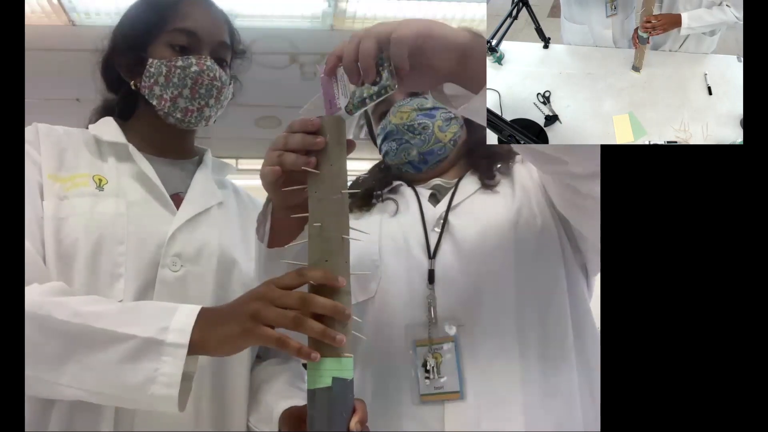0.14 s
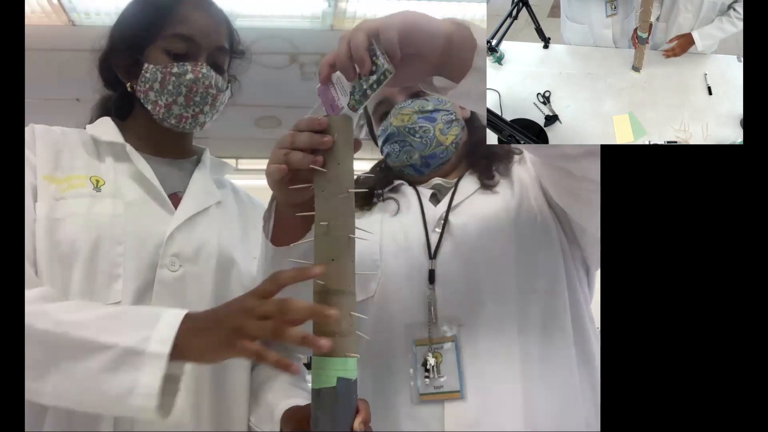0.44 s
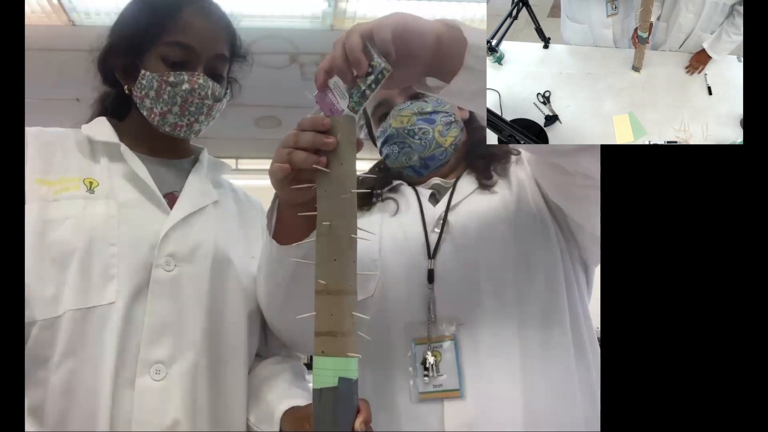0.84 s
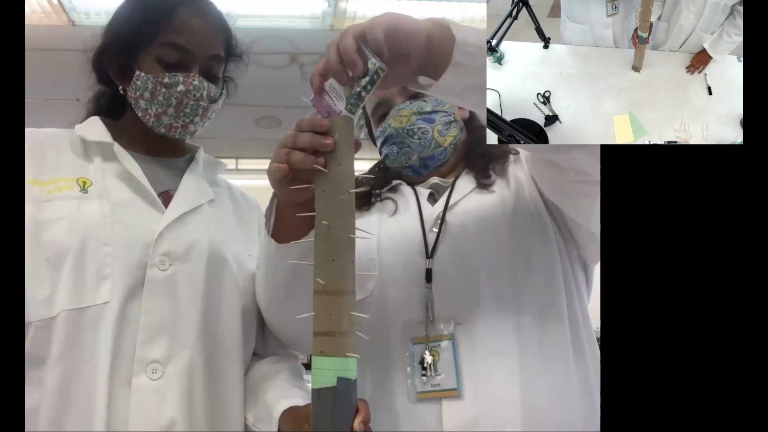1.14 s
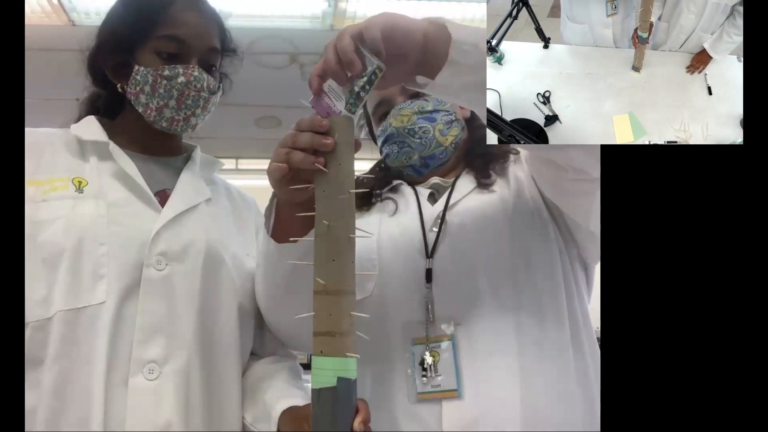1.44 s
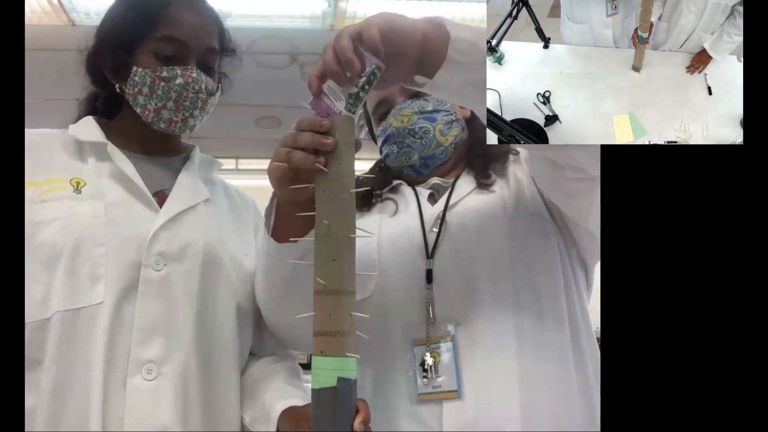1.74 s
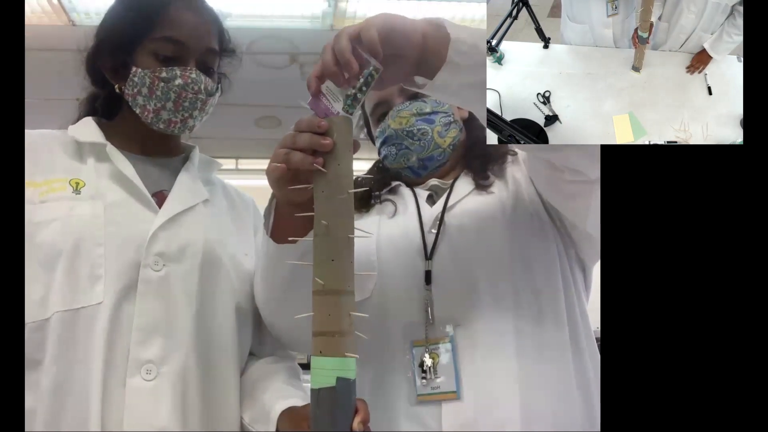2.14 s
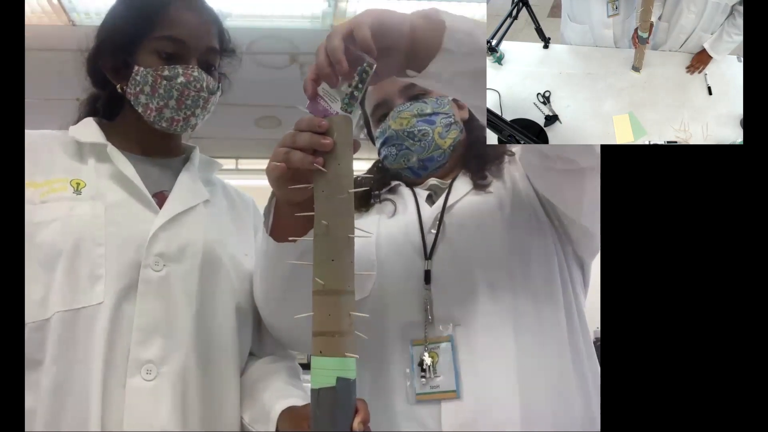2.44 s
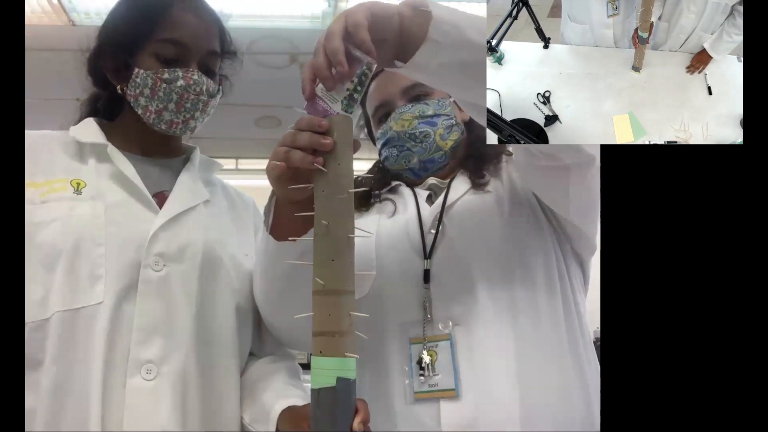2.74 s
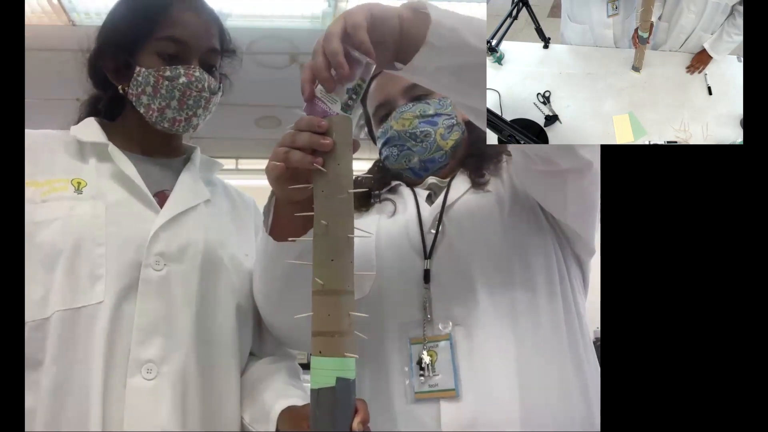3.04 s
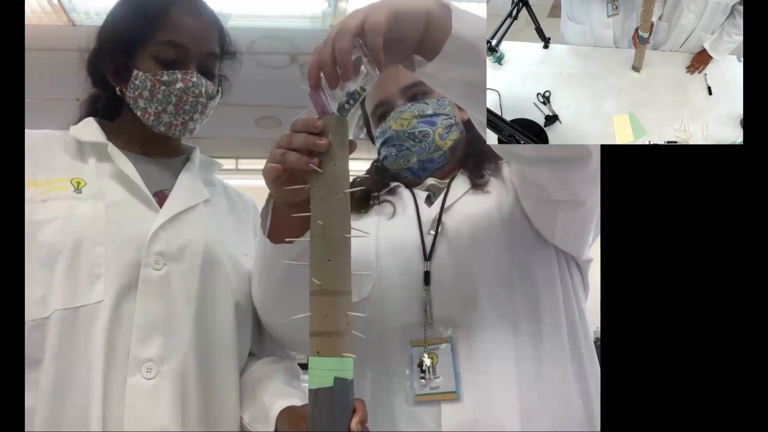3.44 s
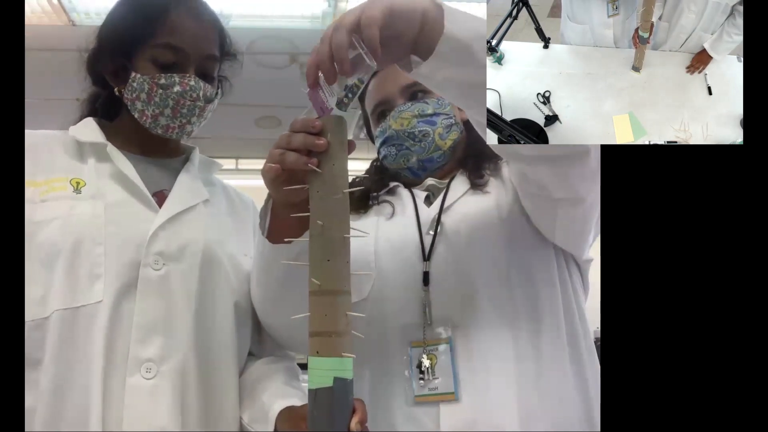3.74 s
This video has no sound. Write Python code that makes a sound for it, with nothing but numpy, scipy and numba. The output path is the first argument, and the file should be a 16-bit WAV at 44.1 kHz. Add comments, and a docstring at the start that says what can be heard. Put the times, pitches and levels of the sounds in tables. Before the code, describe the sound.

Small beads pour down a cardboard tube crossed with toothpicks, heard close in a quiet room. Faint scattered ticks until 0.5 s, then the patter builds quickly to a dense, bright, rain-like hiss from 0.85 to 1.8 s. It thins and stutters around 2.2-2.4 s with ringing clusters, swells again to about 3.4 s, breaks into clicks and fades by 3.75 s, leaving faint room air, low rumble and hum.

```python
"""Small beads patter, swell and thin out as they pour into an upright cardboard tube spiked with toothpicks.
The dense stream is thousands of tiny dying sines, dry clicks and noise, in four bands that flicker.
Clusters of ringing knocks and short hard ticks stand out of it.
Behind them a quiet indoor room has noise for air, a low rumble and a sine hum that wavers."""
import sys
import numpy as np
from scipy import signal
from scipy.fft import rfft, irfft
from scipy.io import wavfile
from scipy.ndimage import uniform_filter1d
from numba import njit

SR = 44100
rng = np.random.default_rng(int(sys.argv[2]) if len(sys.argv) > 2 else 0)


def natural_amplitude(level_db):
    """Convert a level in decibels to a linear amplitude factor, elementwise."""
    exponent = np.asarray(level_db, float) / 20
    return 10 ** exponent


def inscribe(sig):
    """Save sig as 16-bit PCM at rate SR to the path in sys.argv[1].

    A 1-D sig is mono; a 2-D sig holds one channel per row.
    Samples are clipped to [-1, 1] before scaling.
    """
    pcm = np.round(np.clip(np.atleast_2d(sig).T, -1, 1) * 32767)
    wavfile.write(sys.argv[1], SR, pcm.astype(np.int16))


N = 171990  # length in samples

# how strongly the beads pour, before surges and a small trim: t/s, level/dB
FLOW = [(0, -57), (.06, -56.5), (.085, -68), (.15, -62), (.19, -67), (.2, -68), (.215, -57.5), (.3, -54.5),
        (.355, -59.5), (.39, -53.5), (.475, -50.5), (.495, -44.5), (.65, -41.5), (.86, -34), (.97, -35),
        (1.29, -33), (1.49, -34), (1.72, -35), (1.94, -39), (2.15, -39), (2.245, -50), (2.27, -36.5),
        (2.315, -48), (2.351, -41), (2.378, -55), (2.39, -44.5), (2.41, -43.5), (2.45, -41), (2.5, -44.5),
        (2.57, -41.5), (2.61, -43), (2.63, -40.5), (2.75, -38.5), (3.04, -35), (3.19, -36), (3.358, -36),
        (3.374, -44), (3.45, -37.5), (3.49, -38.5), (3.505, -42.5), (3.55, -40), (3.62, -45.5),
        (3.645, -49), (3.73, -50), (3.75, -68.5), (3.9, -79)]
# the band in which clusters and hard ticks are heard: low edge f/Hz, high edge f/Hz
KNOCK_EDGES = (1300, 12000)


def unit(x):
    """Scale to rms 1."""
    return x / np.sqrt(np.mean(x ** 2))


def shape(x, points, edges=None):
    """Colour a sound by (f/Hz, gain/dB) points, optionally only between two edges in Hz."""
    f = np.arange(N // 2 + 1) * SR / N + 1  # the 1 avoids log(0)
    points = np.array(points)
    gain = natural_amplitude(np.interp(np.log(f), np.log(points[:, 0]), points[:, 1]))
    if edges:
        low, high = edges
        gain = gain / np.sqrt((1 + (low / f) ** 16) * (1 + (f / high) ** 16))
    return irfft(rfft(x) * gain, N)


def walk(rate):
    """Random levels, a new one every 1 / rate s, joined by slopes; spread near 1."""
    hold = int(SR / rate)
    steps = np.repeat(rng.standard_normal(N // hold + 1), hold)
    return unit(uniform_filter1d(steps, hold)[:N])


@njit
def rings(n, start, hz, cycles, size):
    """Each knock is a sine that dies by 60 dB in the given cycles."""
    y = np.zeros(n)
    for k in range(len(start)):
        turn = np.exp((2j * np.pi - np.log(1000.) / cycles[k]) * hz[k] / 44100.)
        z = size[k] + 0j
        first = int(start[k])
        last = first + int(cycles[k] * 44100. / hz[k])
        for j in range(max(first, 0), min(n, last)):
            y[j] += z.imag
            z *= turn
    return y


def knocks(start, hz, cycles, size):
    """Sum the rings of many knocks; a value shared by several knocks may be given once."""
    each = np.broadcast_arrays(start, hz, cycles, size)
    return rings(N, *[np.array(a).ravel() for a in each])


def clumps(count=6, handfuls=450):
    """Handfuls of beads at random moments; each chatters briefly near one pitch of picks, wall or air column."""
    # what the handfuls ring with: f/Hz, spread between handfuls (share of f), ring/cycles, level/dB
    clump_rings = [(5800, 0.064, 50, -4.5), (2285, 0.17, 34, -12.5), (484, 0.023, 16.5, -14),
                   (246, 0.024, 12, -18)]
    out = 0
    for hz, spread, cycles, db in clump_rings:
        u = rng.random((handfuls, count + 2))
        g = rng.standard_normal((handfuls, count + 1))
        start = u[:, :1] * N - .004 * SR * np.log(u[:, 2:])  # knocks trail by 4 ms on average
        pitch = hz * np.exp(spread * g[:, :1] + 0.029 * g[:, 1:])
        strength = natural_amplitude(-2.2 * np.log(u[:, 1:2] + 0.071))  # a few handfuls are much stronger
        out = out + natural_amplitude(db) * unit(knocks(start, pitch, cycles, strength))
    return out


def bead_knocks():
    """Single beads ring at scattered moments, pitches and sizes; higher pitches ring for more cycles."""
    knocks_per_s, ring_cycles, scatter_db = 5000, 26.6, 1.5
    u = rng.random((int(knocks_per_s * N / SR), 4)).T
    hz = 200 + 13000 * u[1]
    cycles = ring_cycles * (.5 + u[2]) * np.sqrt(hz / 3000)
    size = natural_amplitude(-scatter_db * np.log(u[3] + .002)) * np.sqrt(hz / cycles)  # even out ring energy
    return unit(knocks(u[0] * N, hz, cycles, size))


def dry_clicks():
    """Beads that do not ring: single samples of random size at random moments."""
    clicks_per_s = 700
    return unit((rng.random(N) < clicks_per_s / SR) * rng.standard_normal(N))


def stream():
    """Knocks, dry clicks, clumps and a noise wash of far knocks; the flow surges and each band flickers."""
    # edges of the four bands (tube boom, wall ticks, toothpick rings, bead sizzle): f/Hz
    band_edges = (250, 1200, 4200, 7000, 12500)
    # colour within the bands: f/Hz, relative level/dB
    stream_colour = [(150, -13), (250, -19.5), (370, -22), (473, -9.5), (773, -12), (1590, -7), (2030, -6),
                     (2430, -3), (3490, -7), (5510, -3), (7650, -7.5), (9310, -1.5), (11000, -4.5),
                     (11700, -9), (12500, -29), (16200, -60), (22000, -120)]
    # balance against the wall ticks: t/s, tube boom/dB, toothpick rings/dB, bead sizzle/dB
    band_balance = [(0, -28, -2, -15.5), (.35, -18.5, -4, 2.5), (.6, -19.5, -5.5, -5), (.8, -15.5, 0, -7),
                    (1.3, -11, -3.5, -6.5), (1.8, -10, -2, -7), (2.0, -18.5, -5.5, -6.5),
                    (2.3, -8.5, -6.5, -10.5), (2.45, -13.5, -5.5, -7), (2.85, -16.5, -2, -6.5),
                    (3.1, -13.5, -5, -6), (3.45, -21, -7, -7), (3.6, -18.5, -13.5, -10.5),
                    (3.75, -28, -7, -17), (3.9, -1, 7, -3)]
    click_db, wash_db, trim_db = -9, -0.5, 0.5
    surge_db, jostle_db, flicker_db = 1.2, 1.67, 1.5
    full_flow_db, evening_per_db = -36, 0.1  # a full stream is even, a thin one surges more

    wash = natural_amplitude(wash_db) * rng.standard_normal(N)
    mix = bead_knocks() + natural_amplitude(click_db) * dry_clicks() + clumps() + wash
    t = np.arange(N) / SR
    level_db = np.interp(t, *np.array(FLOW).T)
    uneven = np.clip(.5 + evening_per_db * (full_flow_db - level_db), .3, 1.05)
    surge = uneven * (surge_db * walk(40) + jostle_db * walk(200))
    times, boom, pick_rings, sizzle = np.array(band_balance).T
    out = 0
    for k, balance in enumerate((boom, 0 * boom, pick_rings, sizzle)):
        band = shape(mix, stream_colour, band_edges[k:k + 2])
        band = unit(band * natural_amplitude(surge + flicker_db * walk(60)))
        out = out + band * natural_amplitude(np.interp(t, times, balance))
    return out * natural_amplitude(trim_db + level_db)


def hum():
    """A mains hum: one sine whose phase drifts and whose level wavers."""
    # slow rise and fall of the hum, before its random waver: t/s, rms level/dB
    hum_level = [(0.0, -82), (0.27, -64.5), (0.49, -81), (0.61, -54), (0.66, -95), (0.75, -65), (0.89, -93),
                 (1.04, -64), (1.07, -84), (1.42, -64), (1.44, -88), (1.75, -69.5), (2.07, -82),
                 (2.15, -64), (2.44, -90), (2.51, -60.5), (2.82, -79.5), (3.16, -67), (3.2, -80),
                 (3.49, -73), (3.53, -64.5), (3.71, -66), (3.82, -102), (3.9, -81)]
    hum_hz = 117.8
    t = np.arange(N) / SR
    phase = 2 * np.pi * hum_hz * t + 0.42 * walk(6.8)
    level_db = np.interp(t, *np.array(hum_level).T) + 2.2 * walk(25.7)
    return np.sqrt(2) * np.sin(phase) * natural_amplitude(level_db)


def rumble():
    """Low noise, unsteady, that grows with the flow of beads."""
    # colour of the rumble: f/Hz, relative level/dB
    rumble_colour = [(20, -11), (50, -10), (90, -3.5), (170, 0), (230, -5.5), (330, -10.5), (500, -29.5)]
    rumble_db = -68
    flow_db = np.interp(np.arange(N) / SR, *np.array(FLOW).T)
    swell = natural_amplitude(2.8 * walk(8.9) + 0.15 * flow_db)
    return natural_amplitude(rumble_db) * unit(shape(rng.standard_normal(N), rumble_colour) * swell)


def air():
    """Quiet coloured noise whose level wavers."""
    # colour of the room air: f/Hz, relative level/dB
    air_colour = [(250, -9), (420, -7), (600, -12), (900, -6), (1100, -15.5), (5000, -13.5), (11000, -23),
                  (12300, -36), (14000, -45)]
    air_db = -69
    return natural_amplitude(air_db + 1.6 * walk(12)) * unit(shape(rng.standard_normal(N), air_colour))


def clusters(count=40):
    """A few beads land together: half the knocks ring near one pitch, the others tick across the band."""
    # clusters that stand out: t/s, level before trim and colour/dB, main ring f/Hz, mean knock delay/s
    cluster_list = [(0.0074, -39, 5060, 0.0056), (0.041, -28, 5700, 0.0025), (0.038, -26.5, 2890, 0.004),
                    (0.108, -34.5, 2130, 0.0044), (0.157, -33, 3830, 0.0048), (0.175, -26.5, 2000, 0.0042),
                    (0.209, -23.5, 4420, 0.003), (0.226, -26, 4270, 0.0035), (0.2433, -21.5, 6000, 0.0041),
                    (0.259, -31, 5900, 0.006), (0.2725, -26, 4350, 0.0048), (0.2816, -21, 2270, 0.0044),
                    (0.2884, -23, 2160, 0.0046), (0.3665, -22, 5770, 0.0047), (0.461, -34, 5140, 0.004),
                    (0.522, -24, 2580, 0.004), (0.581, -20, 5850, 0.0045), (0.627, -22, 2010, 0.0036),
                    (0.674, -18.5, 5850, 0.0039), (0.697, -17.5, 1750, 0.0034), (0.723, -24, 2760, 0.0047),
                    (0.754, -17, 5010, 0.004), (0.784, -19, 6000, 0.0032), (1.729, -19.5, 5400, 0.0036),
                    (1.888, -20.5, 2350, 0.0038), (2.178, -26, 2000, 0.0037), (2.2004, -23, 6140, 0.0035),
                    (2.2234, -22, 1780, 0.0038), (2.255, -24.5, 3200, 0.004), (2.27, -20.5, 5100, 0.004),
                    (2.322, -26, 7300, 0.004), (2.34, -19, 1820, 0.0045), (2.386, -29, 1760, 0.0048),
                    (2.4206, -24, 5800, 0.0044), (2.436, -17, 5400, 0.0047), (2.459, -14.5, 5370, 0.004),
                    (2.487, -23, 5140, 0.0041), (2.5566, -17, 6030, 0.0035), (2.626, -16.5, 5670, 0.004),
                    (2.644, -26, 6000, 0.0054), (2.678, -25, 3280, 0.0047), (2.707, -18, 6400, 0.0027),
                    (2.73, -12, 5130, 0.0037), (2.792, -18.5, 4970, 0.0045), (2.8554, -12.5, 5400, 0.0041),
                    (3.098, -19, 3550, 0.0045), (3.1587, -11.5, 6270, 0.0051), (3.345, -19, 2610, 0.0031),
                    (3.4145, -19.5, 6040, 0.0056), (3.471, -17, 6360, 0.0032), (3.538, -20.5, 2650, 0.004),
                    (3.5587, -21, 1860, 0.004), (3.5885, -24.5, 1660, 0.0056), (3.698, -32, 2440, 0.004),
                    (3.722, -31, 1680, 0.0043), (3.8626, -42.5, 1690, 0.004)]
    trim_db, spread, ring_cycles, tick_db = -13, 0.016, 35, -1
    rows = np.array(cluster_list)
    time, level_db, main_hz, length = rows[:, :1], rows[:, 1:2], rows[:, 2:3], np.abs(rows[:, 3:])
    u = rng.random((len(rows), 3, count))
    g = rng.standard_normal((len(rows), count))
    # two random delays added: knocks gather, then thin out
    start = (time - length * np.log(u[:, 0] * rng.random(g.shape)) / 2) * SR
    size = natural_amplitude(level_db + trim_db) * (0.83 + u[:, 2])
    pitch = main_hz * (1 + spread * g[:, ::2])
    tonal = knocks(start[:, ::2], pitch, ring_cycles * np.sqrt(main_hz / 4000), size[:, ::2])
    tick_hz = 1600 * 7.42 ** u[:, 1, 1::2]
    chatter = knocks(start[:, 1::2], tick_hz, 15.8 * np.sqrt(tick_hz / 2000), size[:, 1::2])
    colour = [(1000, -12), (6000, -3.0), (8000, -5), (12000, -3.5)]  # f/Hz, gain/dB
    return shape(tonal + natural_amplitude(tick_db) * chatter, colour, KNOCK_EDGES)


def ticks(count=5):
    """Lone beads click dry on the wall: each is a few very short rings that start almost together."""
    # the lone beads: t/s, level before trim/dB
    tick_list = [(0.021, -29), (0.0318, -35), (0.1397, -39), (0.1704, -39), (0.1784, -30), (0.491, -32),
                 (0.496, -24), (0.5048, -24), (2.819, -17), (2.8549, -23), (2.8794, -18), (3.1625, -23),
                 (3.19, -16), (3.2103, -21), (3.455, -25), (3.5104, -21), (3.549, -13), (3.6287, -24),
                 (3.6514, -26.5), (3.6647, -25)]
    # colour of the ticks: f/Hz, gain/dB
    tick_colour = [(1000, 0), (12000, 0)]
    rows = np.array(tick_list)
    # one ring in each of five steps from 1500 to 6000 Hz
    hz = 1500 * 4.0 ** ((np.arange(count) + rng.random((len(rows), count))) / count)
    start = (rows[:, :1] + 0.00058 * rng.random(hz.shape)) * SR
    size = natural_amplitude(rows[:, 1:2] - 9)
    return shape(knocks(start, hz, 9.7 * np.sqrt(hz / 2500), size), tick_colour, KNOCK_EDGES)


def scene():
    """Beads, steeply low-passed at 12150 Hz, in the quiet room."""
    low_pass = signal.ellip(8, .5, 50, 12150, fs=SR, output="sos")
    beads = signal.sosfilt(low_pass, stream() + clusters() + ticks())
    return (beads + hum() + rumble() + air())[None]


def top_cut(x):
    """Nothing passes above the cut-off."""
    return signal.sosfilt(signal.butter(12, 13100, fs=SR, output="sos"), x)


def record(dry):
    """The scene is the finished mix."""
    return top_cut(dry)


dry = scene()
out = record(dry)
inscribe(out)
```